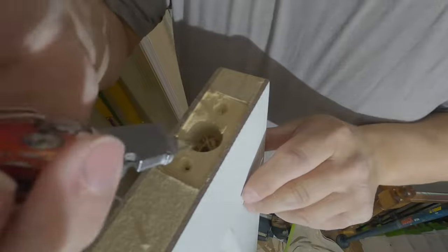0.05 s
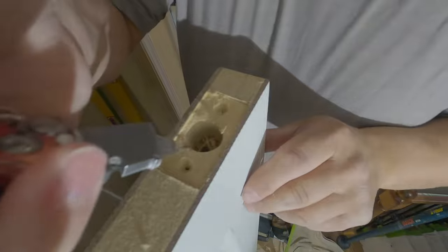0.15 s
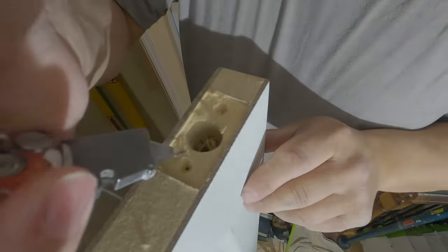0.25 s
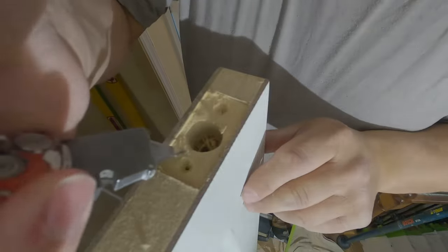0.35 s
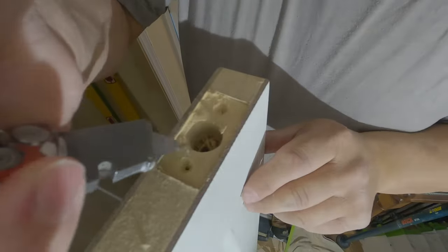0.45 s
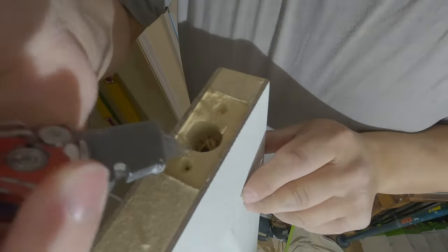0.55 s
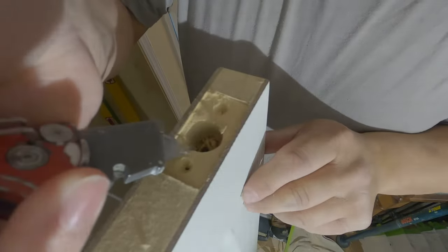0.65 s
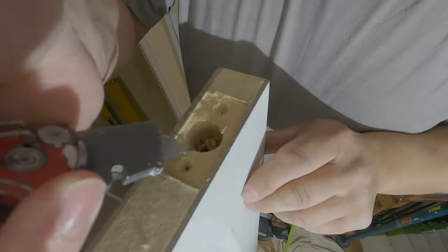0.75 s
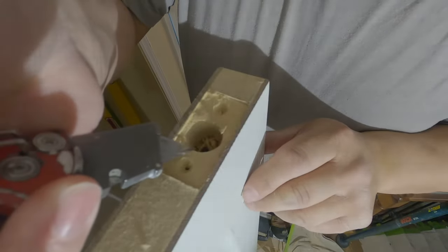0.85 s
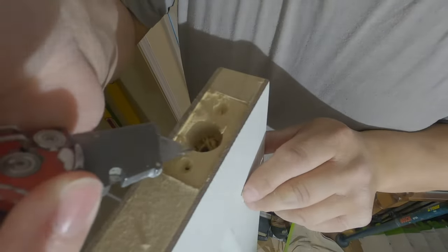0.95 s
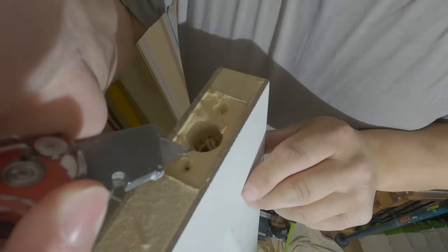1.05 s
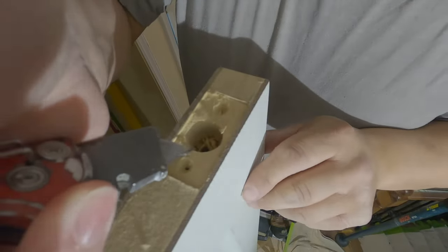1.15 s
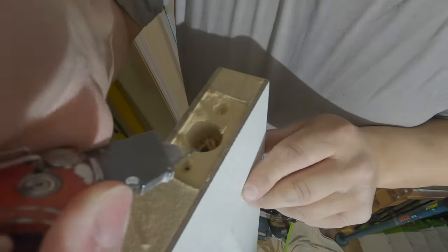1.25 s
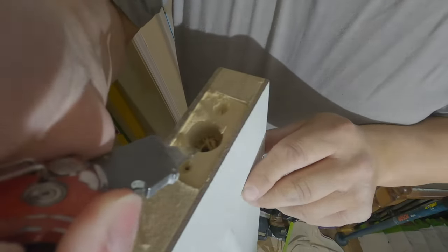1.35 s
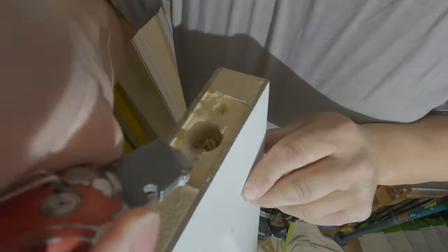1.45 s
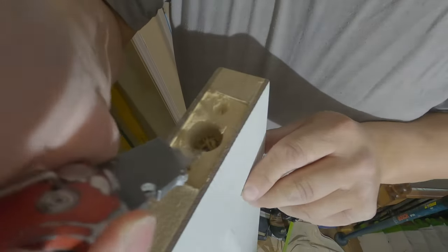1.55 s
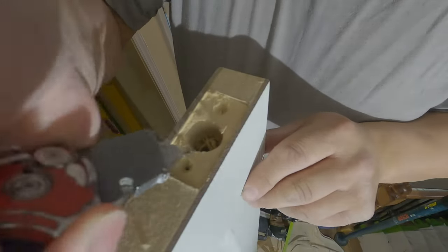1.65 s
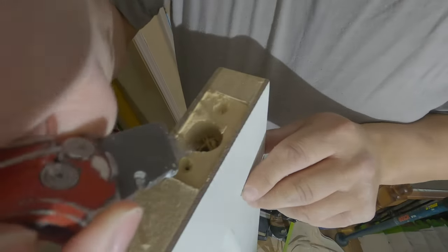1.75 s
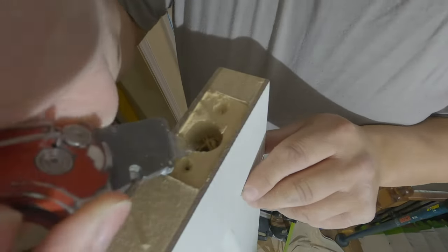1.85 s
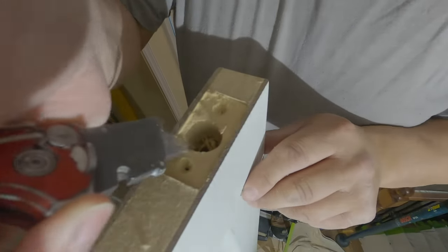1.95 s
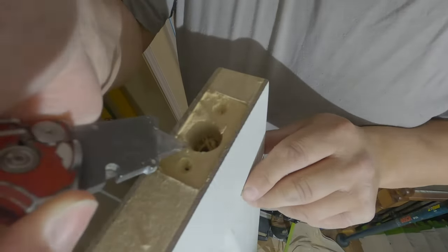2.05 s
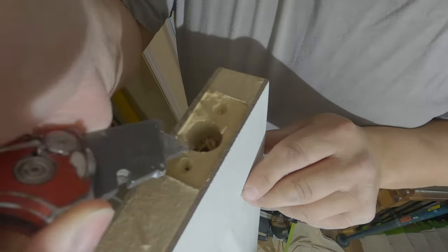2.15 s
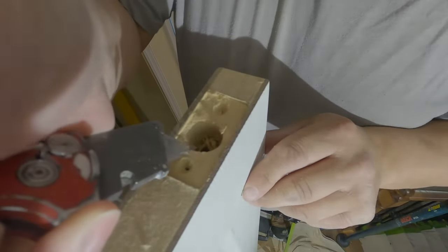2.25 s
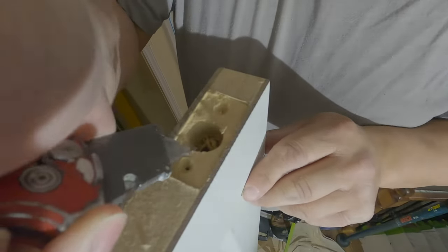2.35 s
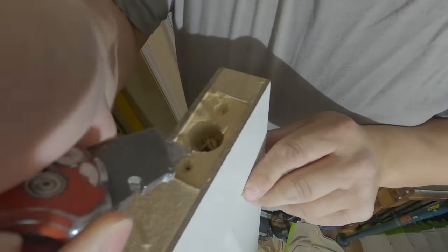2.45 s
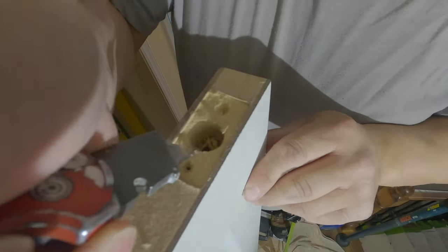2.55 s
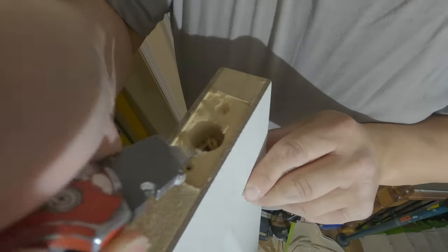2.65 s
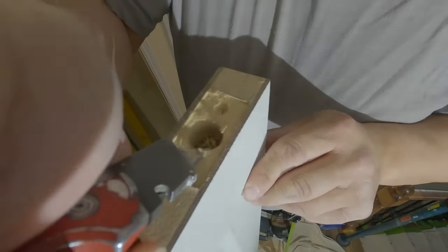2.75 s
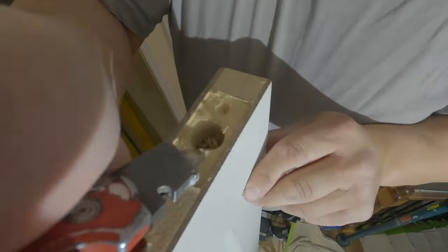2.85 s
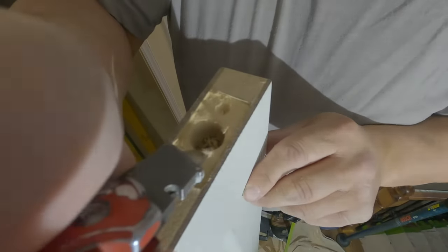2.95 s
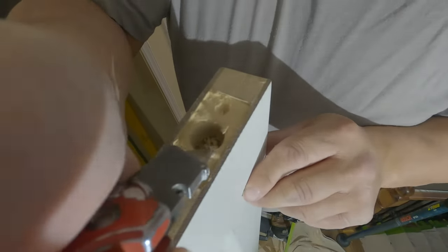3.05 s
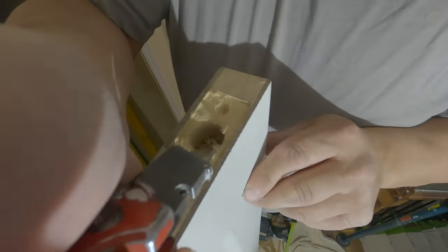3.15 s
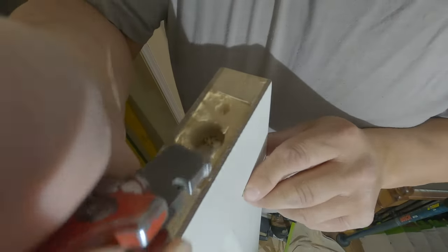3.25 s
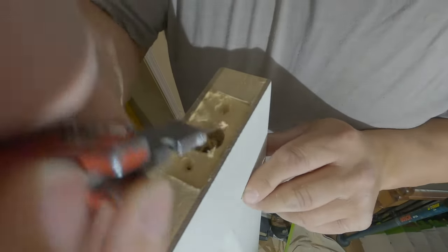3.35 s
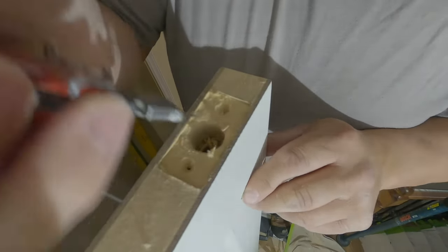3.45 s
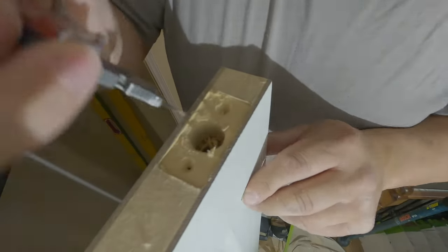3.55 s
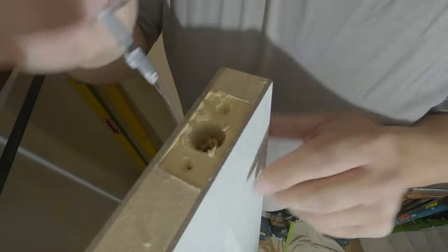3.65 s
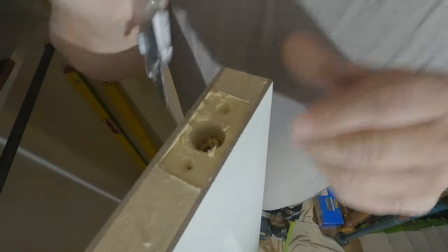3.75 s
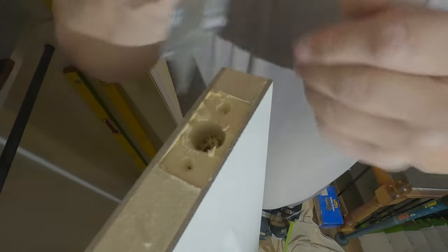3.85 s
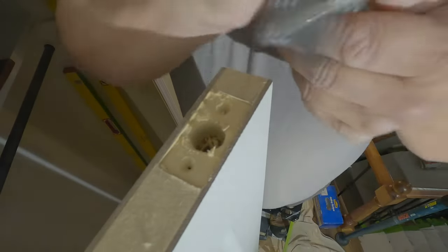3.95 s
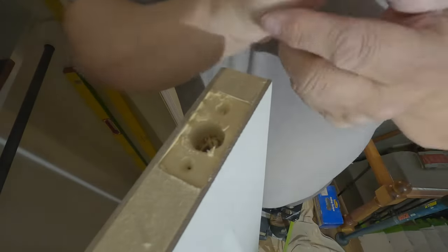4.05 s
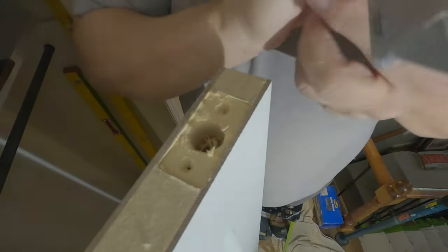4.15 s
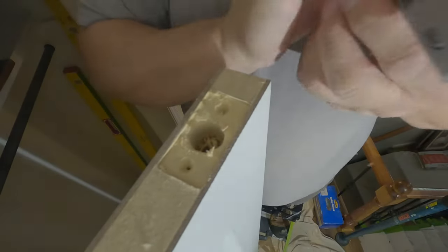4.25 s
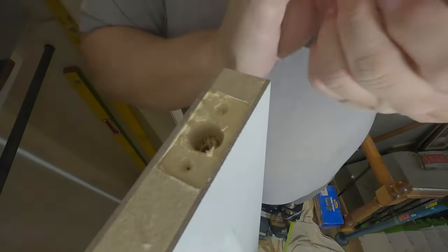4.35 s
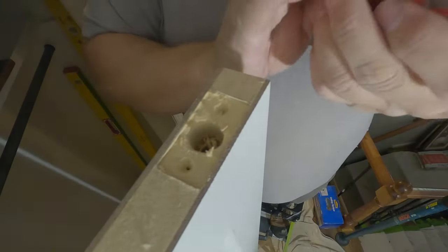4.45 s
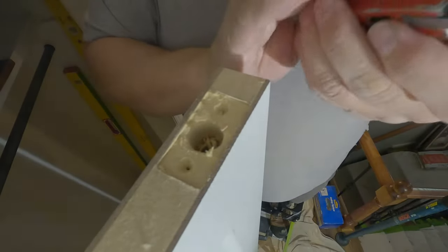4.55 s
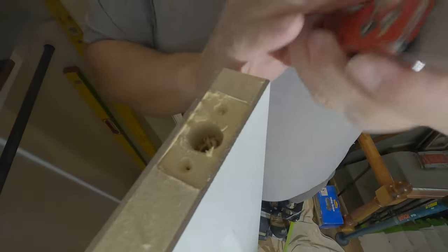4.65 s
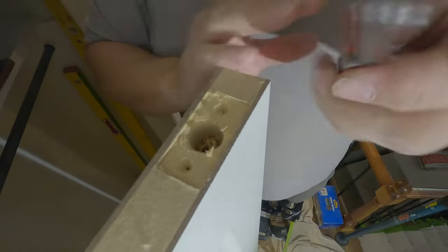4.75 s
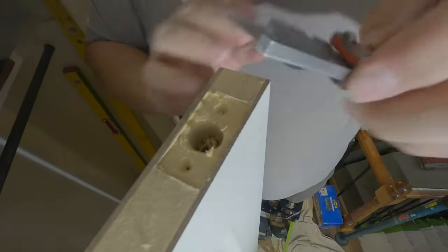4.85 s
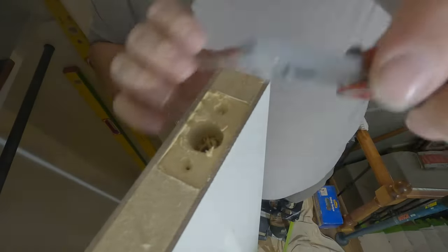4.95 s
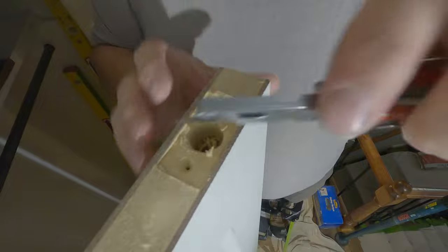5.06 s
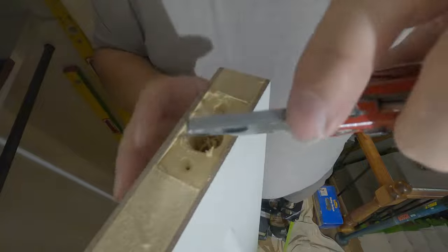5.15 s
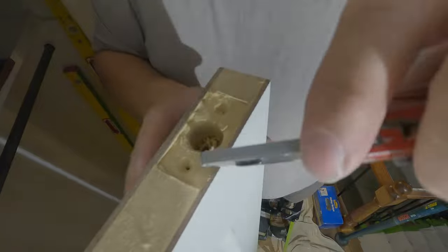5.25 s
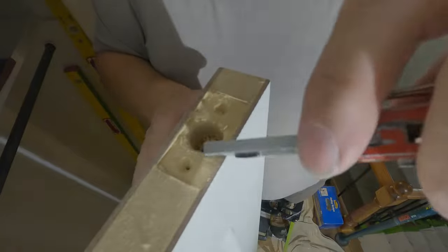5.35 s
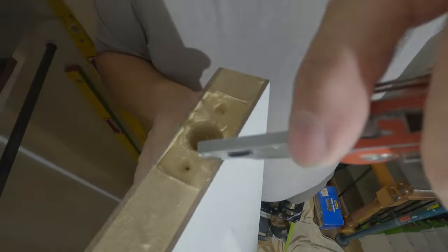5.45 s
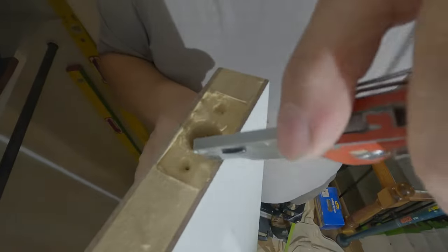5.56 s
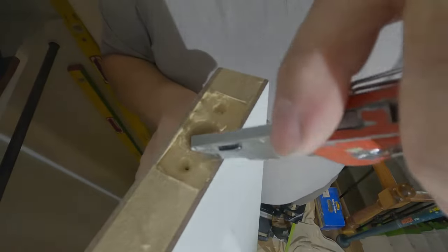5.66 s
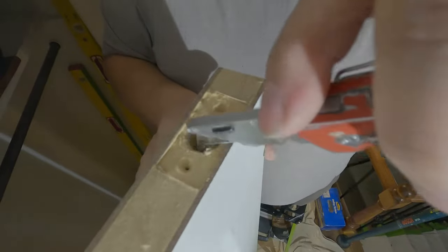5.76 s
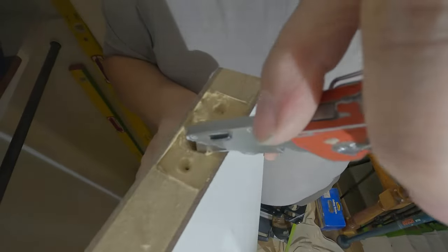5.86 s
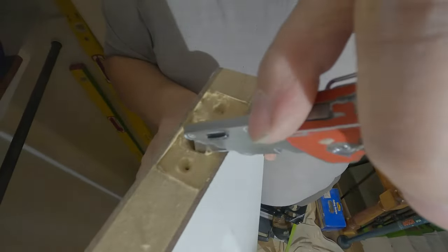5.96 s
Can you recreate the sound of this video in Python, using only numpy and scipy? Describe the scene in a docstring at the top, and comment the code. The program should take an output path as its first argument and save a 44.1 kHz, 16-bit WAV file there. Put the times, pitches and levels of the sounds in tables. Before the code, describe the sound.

A utility knife scrapes and pares fibreboard in irregular close strokes, with sharp snapping clicks and dull thuds from the panel.

```python
"""Paring a hole in fibreboard

A workshop bench, heard close up on a small camera's stereo microphone. A folding utility knife pares
the rim of a hole in a fibreboard panel: the blade scrapes, catches and snaps fibres, and the force
shakes panel and bench. Narrow hisses come and go; late on, one swish passes and the flat of the blade
taps down on the panel. Quiet room tone hums underneath."""
import sys
import numpy as np
from scipy import signal
from scipy.fft import rfft, irfft, next_fast_len
from scipy.io import wavfile
from scipy.ndimage import map_coordinates

SR = 44100
rng = np.random.default_rng(int(sys.argv[2]) if len(sys.argv) > 2 else 0)


def transcribe(signal):
    """Save signal, clipped to [-1, 1], as a 16-bit WAV file at the path in sys.argv[1]."""
    frames = np.atleast_2d(signal).T
    limited = np.clip(frames, -1, 1)
    pcm = np.round(limited * 32767).astype(np.int16)
    wavfile.write(sys.argv[1], SR, pcm)


N = 264600

# strokes of the edge: (start [s], end [s], scrape level [dB], wood offset [dB])
CUT_STROKES = [(0.262, 0.333, -48.5, -14), (0.66, 0.728, -57, -16), (1.485, 1.573, -53.5, 4.5),
               (1.67, 1.736, -55, -9), (1.769, 1.888, -53.5, -3), (2.42, 2.446, -57.5, 3),
               (2.53, 2.593, -55, -2.5), (2.754, 2.847, -44, 3.5), (2.911, 3.052, -50.5, -3.5),
               (3.005, 3.101, -44.5, 0), (3.183, 3.203, -51.5, 0.5), (3.376, 3.508, -57, 0),
               (3.69, 3.73, -59, 7), (5.765, 5.818, -61, -15)]
# edge or fingers resting and shifting lightly: (time [s], rustle level [dB], wood offset [dB])
LIGHT_TOUCH = [(0, -67, 0), (.25, -57, -2.5), (.45, -68.5, 7), (.8, -66, 7.5), (1.01, -75, -2.5),
               (1.35, -62.5, 5.5), (2.0, -66.5, -1), (2.35, -60, -2), (2.68, -65, 6), (3.16, -58.5, 6),
               (3.29, -70, 10), (3.62, -65.5, 5.5), (3.87, -73.5, -7), (4.35, -66.5, 3), (4.8, -67.5, -1),
               (5.3, -74, -1), (5.56, -78, 9), (6, -70.5, 2.5)]
# the blade catches and lets go: (time [s], level [dB], dull over bright [dB])
BLADE_CATCHES = [(0.135, -48, 0), (0.329, -26.5, 6.5), (0.539, -23, -13), (0.5474, -14, -13),
                 (0.5536, -19, -21), (0.6802, -27, 4), (1.2986, -23, -2.5), (1.941, -35, 4),
                 (1.9607, -39, 5.5), (2.0103, -42.5, 4.5), (2.133, -38.5, 3.5), (2.621, -25, -3),
                 (2.907, -30.5, -1.5), (3.1958, -21, -4), (3.372, -20, -7), (3.684, -33, -1.5),
                 (4.117, -43, -7)]
# pushes of the hand: (start [s], end [s], bench level [dB], panel level [dB])
HAND_PUSHES = [(0.121, 0.248, -55.5, -55), (0.28, 0.376, -43, -47.5), (0.513, 0.616, -42, -55),
               (0.658, 0.75, -47.5, -54.5), (1.279, 1.398, -44, -44.5), (1.474, 1.586, -44, -41.5),
               (1.606, 1.763, -51.5, -56), (1.763, 1.927, -41, -48.5), (1.972, 2.08, -57, -57),
               (2.245, 2.335, -45, -51), (2.412, 2.496, -51, -49), (2.593, 2.74, -35, -41.5),
               (2.758, 2.893, -32, -33), (2.898, 3.123, -36, -38.5), (3.148, 3.253, -33, -43),
               (3.364, 3.425, -47.5, -50), (3.417, 3.65, -53.5, -58.5), (3.672, 3.744, -46, -44.5),
               (4.867, 4.984, -45, -51), (5.327, 5.468, -43, -85), (5.55, 5.69, -57.5, -65),
               (5.783, 5.811, -60.5, -49)]
# the wedged edge creaks forward: (time [s], level [dB])
EDGE_SLIPS = [(0.386, -41), (1.3379, -38), (1.4012, -40.5), (1.4212, -38), (1.4341, -38), (1.4535, -34.5),
              (1.475, -37.5), (1.504, -37), (1.5373, -38), (2.5524, -35), (2.5631, -34), (2.6677, -33),
              (2.6852, -29.5), (2.7057, -32.5), (2.7366, -32), (2.7621, -31), (2.883, -39)]
# the flat of the blade meets the panel: (time [s], level [dB])
BLADE_TAPS = [(5.627, -47), (5.719, -41), (5.7978, -27), (5.804, -35.5), (5.841, -42)]
# the blade knocks the rim: (time [s], level [dB])
RIM_KNOCKS = [(2.976, -35), (3.031, -25.5)]
# raspy hisses, perhaps skin on the handle: (start [s], end [s], level [dB], centre [Hz])
HISS_BANDS = [(0, 0.14, -53, 3820), (0.145, 0.24, -49, 3710), (0, 0.3, -58, 2350),
              (0.315, 0.333, -44, 2450), (0.685, 0.78, -49, 3600), (0.83, 1.0, -64, 3520),
              (1.12, 1.21, -59, 3450), (1.5, 1.64, -59, 7300), (1.69, 1.75, -56, 5500),
              (1.82, 1.98, -54, 3450), (1.82, 1.96, -56, 2600), (2.03, 2.36, -62, 3300),
              (2.95, 3.05, -54, 7250), (3.07, 3.095, -47, 4350), (3.13, 3.38, -64, 4500),
              (3.45, 3.68, -64, 7200), (3.42, 3.8, -62, 2350), (3.79, 4.07, -59.5, 3750),
              (4.27, 4.6, -64, 3780)]

# ring of the blade: (frequency [Hz], width [Hz], gain [dB])
BLADE_MODES = [(3230, 1040, 1), (4550, 1320, 2), (6680, 2240, -2.5), (9100, 3500, -15)]
# wood under the edge: (frequency [Hz], width [Hz], gain [dB])
WOOD_MODES = [(1102, 202, 2.5), (1876, 435, 3), (2680, 280, -1)]
# the tip springing free: (frequency [Hz], width [Hz], gain [dB])
TIP_MODES = [(2250, 300, 4), (3600, 450, 4), (5300, 1000, -5), (6950, 1200, -1)]
# drone of the panel: (frequency [Hz], width [Hz], gain [dB])
PANEL_MODES = [(160.5, 64.6, -5.5), (205.2, 27.1, 0.5), (246.6, 23, -1.5), (309, 60.4, -6.5),
               (388.5, 72.6, -9)]
# stiffer panel modes that a hard push wakes: (frequency [Hz], width [Hz], gain [dB])
CRUNCH_MODES = [(440.6, 57, 1), (749, 156, -1.5)]
# rumble of the bench: (frequency [Hz], width [Hz], gain [dB])
BENCH_MODES = [(30.4, 19, -1.5), (62.1, 16.7, 2), (88, 27, -0.5), (123, 38, -7.5)]
# wood round a slipping edge: (frequency [Hz], gain [dB], t60 [s])
SLIP_MODES = [(1860, -3.5, .022), (2590, -5.5, 0.009)]
# ring of the hole: (frequency [Hz], gain [dB], t60 [s])
HOLE_MODES = [(706, 4.5, 0.11), (967, -3, 0.085)]

# room tone of the workshop: (frequency [Hz], relative level [dB])
ROOM_SPECTRUM = [(25, 3), (60, -8), (105, -40), (140, 5.5), (210, -4), (420, -12), (800, -19),
                 (4000, -27.5), (8000, -26), (10000, -43), (14000, -27.5)]
# how alike the two microphone ports sound: (frequency [Hz], likeness [0-1])
PORT_LIKENESS = [(40, 0.47), (2000, 0.64), (12000, 0.02)]
# balance at the microphone: (frequency [Hz], left minus right [dB])
PORT_BALANCE = [(30, 0), (150, -4), (600, -3.5), (2500, 6), (6000, 1.5), (13000, -2)]

SNAP_T60_S = 0.019
TIME = np.arange(N) / SR
BURST_TIME = TIME[:SR // 20]


def paring():
    """Right by the microphone, the edge sticks and slips; tearing fibres ring blade and wood."""
    splinters_per_s, splinter_db, swing_db, fizz_hz = 260, 10, 2.5, 9900
    touch_db, wood_offset_db = curves(LIGHT_TOUCH)
    touch_db = touch_db + 2.3 * wobble(12)
    blade_cuts = [(start, end, db) for start, end, db, _ in CUT_STROKES]
    wood_cuts = [(start, end, db + offset) for start, end, db, offset in CUT_STROKES]
    blade_db = efforts(blade_cuts, attack_s=0.024, build_db=6, fall_db_per_s=441, rest_db=touch_db)
    wood_db = efforts(wood_cuts, attack_s=0.024, build_db=2.5, fall_db_per_s=305)
    snapped = rng.random(N) < splinters_per_s / SR
    splinters = snapped * amp(splinter_db + 5.3 * rng.standard_normal(N)) * [[1], [.3]]
    fibres = (grit(0.55) + splinters) * amp(swing_db * wobble(90))
    crackle = fibres + amp(6) * splinters  # the wood answers single snaps more than the blade does

    def ring(feed, modes):
        """Each resonance swells on its own as the edge turns."""
        return unit(sum((-1) ** k * amp(swing_db * wobble(13)) * filtered(feed, ringing([mode]))
                        for k, mode in enumerate(modes)))

    treble = unit(filtered(fibres, lambda hz: (hz / fizz_hz) ** 4 / (1 + (hz / fizz_hz) ** 4)))
    fizz = amp(1.07 * blade_db - 5.5) * treble  # grows faster than the scrape
    rustle = amp(touch_db + wood_offset_db) * unit(filtered(grit(1), ringing(WOOD_MODES[:2])))
    blade = amp(blade_db + 4) * ring(fibres, BLADE_MODES)
    wood = amp(wood_db) * ring(crackle, WOOD_MODES)
    return fizz + blade + wood + rustle


def shaking():
    """Each push shakes the panel, then the heavy bench; rung twice, both stay dark between modes."""
    lag_s = 0.018
    bench_pushes = [(start + lag_s, end + lag_s, db) for start, end, db, _ in HAND_PUSHES]
    panel_pushes = [(start, end, db) for start, end, _, db in HAND_PUSHES]
    bench_db = efforts(bench_pushes, attack_s=0.018, fall_db_per_s=201, rest_db=-83.5)
    panel_db = efforts(panel_pushes, attack_s=0.018, fall_db_per_s=251, rest_db=-67)
    force = grit(3.6)
    panel = unit(filtered(force, lambda hz: ringing(PANEL_MODES)(hz) ** 2))
    crunch = unit(filtered(force, ringing(CRUNCH_MODES)))
    bench = unit(filtered(grit(2.44), lambda hz: ringing(BENCH_MODES)(hz) ** 2))
    return (amp(panel_db + 2.5 * wobble(18)) * panel
            + amp(1.315 * panel_db) * crunch
            + amp(bench_db + 2.04 * wobble(14)) * bench)


def catches():
    """The caught tip springs free: a click and a short burst ring its dull and bright modes."""
    dull, bright = np.zeros((2, 2, N))
    for start, db, dull_db in BLADE_CATCHES:
        snap = burst(db)
        snap[0, 0] += amp(db - 0.5)  # the sharp release
        bright_share = np.sqrt(np.clip(1 - amp(2 * dull_db), .1, 1))
        add_at(dull, start, snap * amp(dull_db + 3))
        add_at(bright, start, snap * bright_share * amp(-4))
    bright_modes = TIP_MODES[1:] + BLADE_MODES[3:]
    return filtered(dull, ringing(TIP_MODES[:1])) + filtered(bright, ringing(bright_modes))


def slips():
    """Each slip is a dry woody tick, never quite the same pitch; slips and catches jolt the panel."""
    ticks, kicks = np.zeros((2, N))
    for start, db in EDGE_SLIPS:
        for hz, gain_db, t60 in SLIP_MODES:
            detune = 1 + .04 * rng.standard_normal()
            add_at(ticks, start, damped_sine(BURST_TIME, hz * detune, db + gain_db, t60))
    for start, db, *_ in EDGE_SLIPS + BLADE_CATCHES:
        kicks[round(start * SR)] = amp(db + 1.5)
    jolts = filtered(kicks, ringing(PANEL_MODES[1:3] + CRUNCH_MODES))
    return (ticks + jolts) * [[1], [.3]]


def taps():
    """Set flat on the panel, the blade rings briefly in its upper modes."""
    bursts = np.zeros((2, N))
    for start, db in BLADE_TAPS:
        add_at(bursts, start, burst(db))
    return filtered(bursts, ringing(BLADE_MODES[1:3]))


def knocks():
    """The hole rings briefly when the blade knocks its rim."""
    out, rise_s = np.zeros(N), 0.0014
    for start, db in RIM_KNOCKS:
        age = np.clip(TIME - start, 0, None)
        ring = sum(damped_sine(age, *mode) for mode in HOLE_MODES)
        out += amp(db) * ring * (1 - np.exp(-age / rise_s))
    return out * [[.8], [-.7]]


def hisses():
    """Narrow, fluttering bands of noise fade in and out, drifting a little in pitch."""
    flutter_db, half_width_hz = 2.2, 160
    cos_noise, sin_noise = (
        unit(filtered(grit(flutter_db), lambda hz: 1 / (1 + (hz / half_width_hz) ** 2)))
        for _ in range(2))
    drifting_time = np.cumsum(1 + 0.008 * wobble(9)) / SR
    out = np.zeros((2, N))
    for start, end, db, hz in HISS_BANDS:
        fade_in = (TIME - start + .01) / min(.04, end - start)
        fade_out = (end - TIME + .02) / min(.12, end - start)
        swell = np.sqrt(np.clip(np.minimum(fade_in, fade_out), 0, 1))
        phase = 2 * np.pi * hz * drifting_time
        out += amp(db) * swell * (cos_noise * np.cos(phase) + sin_noise * np.sin(phase))
    return out * amp(flutter_db * wobble(29.84))


def swish():
    """Noise starts at once; its resonance sinks, and its treble dulls as it dies."""
    start, end, from_hz, to_hz, tilt_db_per_octave = 4.8315, 4.94, 2700, 1250, -6.5
    hz, t, spectrum = signal.stft(rng.standard_normal((2, N)), SR, nperseg=256)
    progress = np.clip((t - start) / (end - start), 0, 1.5)  # sinks on through the tail
    centre_hz = from_hz * (to_hz / from_hz) ** progress
    ratio = (hz[:, None] + 1) / centre_hz
    low_cut = 1 / (1 + (2 * ratio) ** -6)
    peak = .8 * np.exp(-(np.log(ratio) / .2) ** 2)
    tilt = amp(tilt_db_per_octave * np.maximum(progress, 1) ** 2 * np.log2(1 + ratio))
    noise = unit(signal.istft(spectrum * tilt * (low_cut + peak), SR, nperseg=256)[1][:, :N])
    return noise * amp(efforts([(start, end, -45.5)], attack_s=.002, fall_db_per_s=290))


def room_tone():
    """The workshop behind the bench: a steady, low hum of noise."""
    return amp(-63) * unit(filtered(rng.standard_normal((2, N)), lambda hz: amp(along(ROOM_SPECTRUM, hz))))


def amp(db):
    """Gain of a level in dB."""
    return 10 ** (np.asarray(db) / 20)


def unit(x):
    """Scaled to rms 1."""
    return x / np.sqrt(np.mean(x ** 2) + 1e-20)


def along(points, hz):
    """(frequency [Hz], value) points read on a log axis."""
    knots_hz, values = np.transpose(points)
    return np.interp(np.log(hz + 1), np.log(knots_hz + 1), values)


def curves(rows):
    """One value per sample for each column after the time."""
    times, *columns = np.transpose(rows)
    return [np.interp(TIME, times, column) for column in columns]


def wobble(rate):
    """A smooth random curve, rate knots a second."""
    return map_coordinates(rng.standard_normal(int(N * rate / SR) + 4), [TIME * rate])


def grit(spike_db):
    """Two noises whose size jumps as fibres tear."""
    return rng.standard_normal((2, N)) * amp(spike_db * wobble(400))


def burst(db):
    """Two noises that die within milliseconds."""
    return amp(db - 60 * BURST_TIME / SNAP_T60_S) * rng.standard_normal((2, len(BURST_TIME)))


def damped_sine(t, hz, db, t60):
    """One struck mode dying away."""
    return amp(db - 60 * t / t60) * np.sin(2 * np.pi * hz * t)


def add_at(track, start_s, sound):
    """Mix a short sound into a track."""
    track[..., round(start_s * SR):][..., :sound.shape[-1]] += sound


def efforts(rows, attack_s, fall_db_per_s, build_db=0, rest_db=-120):
    """Level curve of (start [s], end [s], level [dB]) efforts: take hold, build up, let go."""
    power = amp(2 * rest_db)
    for start, end, db in rows:
        hold = np.clip((TIME - start) / attack_s, 0, 1)
        progress = np.clip((TIME - start) / (end - start), 0, 1)
        shape_db = build_db * (progress - 1) - fall_db_per_s * np.clip(TIME - end, 0, None)
        power = power + hold ** 2 * amp(2 * (db + shape_db))
    return 10 * np.log10(power)


def filtered(x, response):
    """x through a complex response of frequency."""
    size = next_fast_len(N + SR // 2)
    return irfft(rfft(x, size) * response(np.fft.rfftfreq(size, 1 / SR)), size)[..., :N]


def ringing(modes):
    """Causal response of a set of resonances, alternating in sign."""
    return lambda hz: sum(
        (-1) ** k * amp(db) * 1j * hz * width / (centre ** 2 - hz ** 2 + 1j * hz * width)
        for k, (centre, width, db) in enumerate(modes))


def microphone_ports(pair):
    """Mid and side become left and right; the left port hears all but the treble a little later."""
    def width(hz):
        angle = np.arccos(np.clip(along(PORT_LIKENESS, hz), -1, 1)) / 2
        return np.array([np.cos(angle), np.sin(angle)])

    def placement(hz):
        split = np.array([[.5], [-.5]])
        lag_s = 4e-5 / (1 + (hz / 6000) ** 2)
        return amp(along(PORT_BALANCE, hz) * split) * np.exp(-2j * np.pi * hz * lag_s * split)

    mid, side = filtered(pair, width)
    return filtered(np.array([mid + side, mid - side]), placement)


def scene():
    """Knife work up close and the room behind, each a mid-side pair, reach the microphone."""
    knife = paring() + shaking() + catches() + slips() + taps() + knocks()
    return microphone_ports(knife + hisses() + swish() + room_tone())


def record(dry):
    """The camera microphone fades in the top octave and keeps nothing above its limit."""
    roll_off_hz, limit_hz = 12500, 15700
    return filtered(dry, lambda hz: (hz < limit_hz) / (1 + (hz / roll_off_hz) ** 11))


dry = scene()
out = record(dry)
transcribe(out)
```